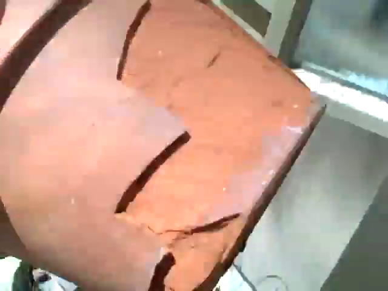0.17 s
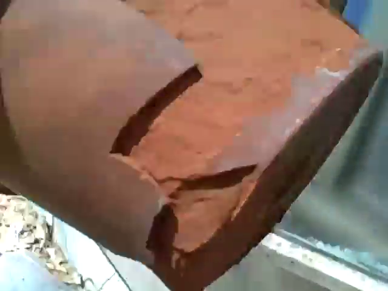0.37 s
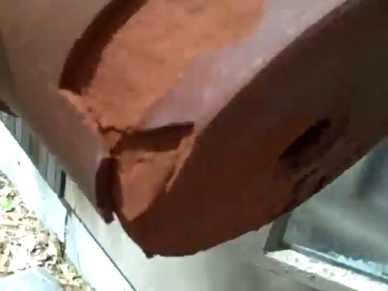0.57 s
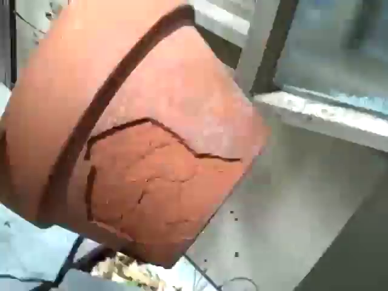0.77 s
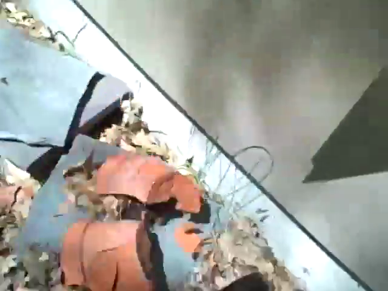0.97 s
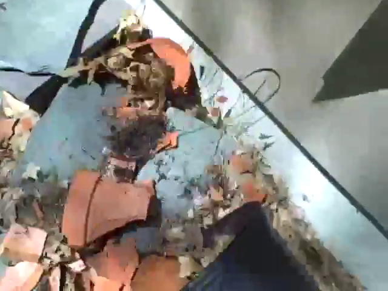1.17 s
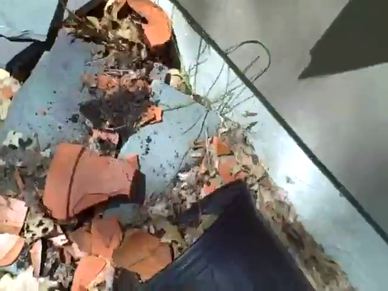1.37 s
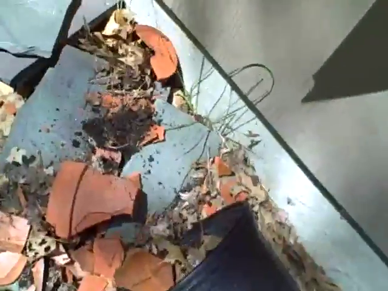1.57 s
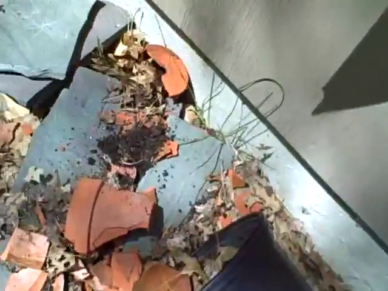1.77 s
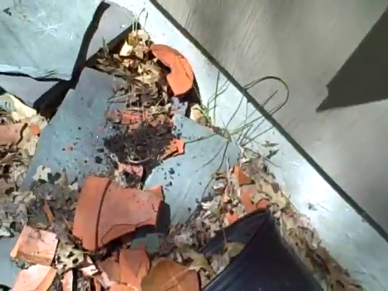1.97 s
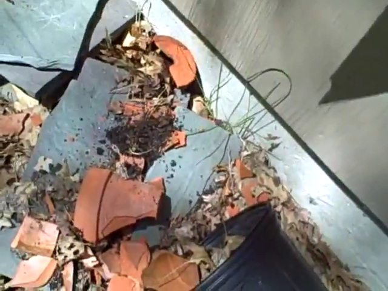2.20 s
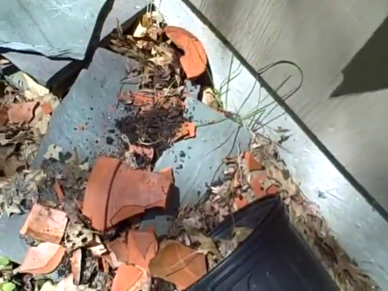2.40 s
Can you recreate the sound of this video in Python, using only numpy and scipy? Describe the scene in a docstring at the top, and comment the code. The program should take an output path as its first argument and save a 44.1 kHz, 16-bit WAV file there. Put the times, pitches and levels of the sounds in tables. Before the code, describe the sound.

A terracotta pot shatters on stone slabs after a quiet second of faint ticks; shards clatter and crumbs patter out quickly. Outdoors, close microphone overloading slightly, with distant traffic, light wind rumble and a faint bird.

```python
"""A terracotta pot is swung and thrown on stone slabs outdoors. It bursts in a dense run of cracks made of many
tiny rings; large shards chatter, crack and ring briefly, heavy pieces thud, soil and crumbs patter into dry leaves.
Filtered noise makes the distant traffic and the wind on the microphone; blurred gliding whistles make a far bird.
The recorder turns its gain down for a while after the crash and overloads on the peaks."""
import sys
import numpy as np
from scipy import signal
from scipy.io import wavfile
from scipy.ndimage import uniform_filter1d

SR = 44100
rng = np.random.default_rng(int(sys.argv[2]) if len(sys.argv) > 2 else 0)


def ratio(d):
    """dB to gain"""
    e = np.asarray(d, float) / 20
    return 10 ** e


def to_wav(sig):
    """Store sig (one row per channel, or 1-D mono) as 16-bit WAV at the path in sys.argv[1].

    Samples outside -1..1 are clipped; the rate is SR.
    """
    pcm = np.clip(np.atleast_2d(sig), -1, 1) * 32767
    pcm = np.round(pcm).astype(np.int16)
    wavfile.write(sys.argv[1], SR, pcm.T)  # frames by channels


N = 107559
T = np.arange(N) / SR  # time of each sample, s


def rms_one(x):
    """Scale to an rms (average strength) of 1."""
    return x / np.sqrt(np.mean(x ** 2) + 1e-20)


def at_hz(points, hz):
    """Read a spectrum of (Hz, dB) points at one pitch, with straight lines on a log pitch axis."""
    point_hz, point_db = np.transpose(points)
    return np.interp(np.log(hz), np.log(point_hz), point_db)


def level_over_time(points):
    """Join (s, dB) points with straight lines: one dB value for each sample."""
    return np.interp(T, *np.transpose(points))


def band(x, low_hz, high_hz):
    """Keep what lies between two pitches (Butterworth band-pass)."""
    edges_hz = [low_hz, min(high_hz, .45 * SR)]
    return signal.sosfilt(signal.butter(2, edges_hz, "band", fs=SR, output="sos"), x)


def drift(rate_hz):
    """Slow random wandering with rms 1, worked out at every 40th sample and joined by lines."""
    step = 40
    r = np.exp(-2 * np.pi * step * rate_hz / SR)
    chance = rng.standard_normal(N // step + 2002)
    slow = signal.lfilter([1], [1, -2 * r, r * r], chance)[2000:]  # skip the filter's start
    return np.interp(np.arange(N) / step, np.arange(len(slow)), rms_one(slow))


def ring(clicks, hz, t60_s):
    """A resonator: each unit click starts a sine of height 1 that dies by 60 dB in t60_s."""
    r = ratio(-60 / (t60_s * SR))
    w = 2 * np.pi * min(hz, .45 * SR) / SR
    return signal.lfilter([0, np.sin(w)], [1, -2 * r * np.cos(w), r * r], clicks + 1e-18)


def add(out, start_s, piece, peak_db):
    """Lay a short sound into out at its start time, scaled to the given peak."""
    i = int(start_s * SR)
    out[i:i + len(piece)] += (ratio(peak_db) * piece / np.abs(piece).max())[:N - i]


def traffic():
    """Distant traffic: third-octave bands of noise, each flickering a little."""
    # spectrum of the far roar: pitch_hz [Hz], level_db [dB per Hz, relative]
    roar_colour = [(60, -1), (171, -8), (260, -7.5), (700, -11), (1420, -15.5), (2600, -25), (5220, -35),
                   (9000, -61)]
    # strength of the roar over time: time_s [s], level_db [dB]
    roar_level = [(0, -51.5), (2.0, -52), (2.35, -49.5)]
    edges_hz = 60 * 2 ** np.arange(0, 7.4, 1 / 3)
    white = rng.standard_normal((2, N))  # neighbouring bands take turns with two noises
    roar = np.zeros(N)
    for k, (low_hz, high_hz) in enumerate(zip(edges_hz, edges_hz[1:])):
        level_db = at_hz(roar_colour, np.sqrt(low_hz * high_hz)) + 0.4 * drift(12)
        roar += ratio(level_db) * band(white[k % 2], low_hz, high_hz)
    return ratio(level_over_time(roar_level)) * rms_one(roar)


def wind():
    """Wind on the microphone: lumpy low noise that follows the gusts, plus short swings of pressure."""
    # strength of the wind over time: time_s [s], level_db [dB]
    gusts = [(0.0, -54.5), (0.57, -57.5), (0.8, -51), (1.0, -50.5), (1.4, -53), (1.97, -46.5), (2.16, -53),
             (2.44, -56.5)]
    # single buffets: start_s [s], peak_db [dB], pitch_hz [Hz]
    buffets = [(0.771, -41.5, 39.3), (0.795, -37, 59.5), (0.877, -40, 50), (1.558, -30.5, 51),
               (1.607, -35.5, 55), (1.673, -36, 59.9), (1.869, -33, 31.6), (1.93, -42.5, 44.5),
               (2.102, -42, 39.67), (2.14, -41, 45), (2.408, -33, 44.6)]
    wind_hz, lumps_db = 85, 2
    noise = rng.standard_normal(N + SR)
    low = band(band(noise, 24, wind_hz), 10, 3.7 * wind_hz)[SR:]  # skip the filters' start
    out = ratio(level_over_time(gusts)) * rms_one(low * ratio(lumps_db * drift(9)))
    for start_s, peak_db, pitch_hz in buffets:
        turns = T[:int(1.6 * SR / pitch_hz)] * pitch_hz  # 1.6 cycles
        swell = np.sin(np.pi * (turns / turns[-1]) ** .5) ** 2  # rises faster than it falls
        add(out, start_s, -np.sin(2 * np.pi * turns) * swell, peak_db)
    return out


def bird():
    """A buzzy far bird: gliding sine whistles multiplied by slow noise, which blurs their pitch."""
    # whistles: start_s [s], end_s [s], start_hz [Hz], end_hz [Hz], level_db [dB, sine height before the blur]
    whistles = [(0, 0.192, 5320, 5130, -69), (0, 0.172, 4640, 4530, -70), (1.908, 2.046, 3363, 3306, -69),
                (2.324, 2.458, 3996, 4960, -63)]
    blur_hz, fade_s = 230, 0.021
    out = np.zeros(N)
    blur_filter = signal.butter(2, blur_hz, fs=SR, output="sos")
    blur = rms_one(signal.sosfilt(blur_filter, rng.standard_normal(N)))
    for start_s, end_s, start_hz, end_hz, level_db in whistles:
        time_inside = np.minimum(T - start_s + fade_s, end_s - T + 0.0059)
        shape = np.clip(time_inside / fade_s, 0, 1)
        pitch_hz = np.interp(T, [start_s, end_s], [start_hz, end_hz])
        out += ratio(level_db) * shape * np.sin(2 * np.pi * np.cumsum(pitch_hz) / SR)
    return out * blur


def ticks():
    """Crumbs ticking in the pot and on the ground: each gives a bright scratch and one small ring."""
    # crumbs: start_s [s], peak_db [dB], pitch_hz [Hz], ring_db [dB, ring height over the scratch's first rms]
    crumbs = [(0.4495, -40.5, 2350, 0), (0.449, -43.5, 4290, 0), (0.540, -44, 3000, -16),
              (0.5708, -41.5, 2320, 0), (0.649, -38, 2320, 2.5), (0.8093, -48, 3830, 1),
              (0.857, -37.5, 2550, -4), (1.679, -38.5, 1105, -8), (1.686, -40, 6610, -3.5),
              (1.716, -39.5, 4260, -1.5), (1.7986, -46, 4200, -5.5), (1.8273, -47, 5440, -2),
              (1.841, -53, 4500, -1), (1.8617, -42.5, 4330, -10), (1.899, -53.5, 6000, -5.5),
              (1.93, -54, 7000, -3.5), (1.955, -54.5, 7400, 4.5), (2.297, -52, 5180, 3.5)]
    t60_at_2300_hz_s, scratch_decay_s = .035, 0.00275  # higher crumbs ring shorter
    out, t = np.zeros(N), T[:SR // 20]
    for start_s, peak_db, pitch_hz, ring_db in crumbs:
        noise = band(rng.standard_normal(len(t)), .7 * pitch_hz, max(6000, 1.7 * pitch_hz))
        scratch = rms_one(noise) * np.exp(-t / scratch_decay_s)
        small_ring = ring(t == 0, pitch_hz, t60_at_2300_hz_s * 2300 / pitch_hz)
        add(out, start_s, ratio(ring_db) * small_ring + scratch, peak_db)
    return out


def debris():
    """Cracking, then patter of soil and crumbs: thousands of random clicks a second, dealt to 40 small rings."""
    # strength of cracking and patter over time: time_s [s], level_db [dB]
    patter_level = [(.72, -68.5), (.80, -58.5), (.845, -50), (.865, -42), (.885, -57), (.95, -61.5),
                    (1.032, -53), (1.0328, -10.5), (1.048, -5), (1.058, -13), (1.07, -3), (1.086, -12),
                    (1.093, -16), (1.105, -25.5), (1.125, -23.5), (1.175, -30.5), (1.21, -34.5),
                    (1.24, -39.5), (1.28, -32.5), (1.33, -39), (1.42, -47), (1.55, -44.5), (1.62, -56.5),
                    (1.7, -61.5), (1.95, -68), (2.2, -68)]
    # spectrum at the loudest moment: pitch_hz [Hz], level_db [dB per Hz, relative]
    patter_colour = [(400, -23.5), (900, -2), (1500, -10), (2600, -4), (4200, -7.5), (6000, -7.5),
                     (8000, -7.5), (9500, -17)]
    grains_per_s, spread_db = 14000, 2.8
    cycles = 12.0  # a grain dies by 60 dB in this many cycles
    thinning = 0.068  # dB lost per octave under 2.5 kHz for each dB below the loudest moment
    sizes = ratio(spread_db * np.minimum(rng.exponential(1, N), 5)) * rng.choice([-1, 1], N)
    level_db = level_over_time(patter_level)
    level = ratio(level_db)
    quieter_db = level_db - level_db.max()
    grains = (rng.random(N) < grains_per_s / SR) * sizes * level
    dealt_to = rng.integers(0, 40, N)
    pitches_hz = np.geomspace(450, 9200, 40) * rng.uniform(.97, 1.03, 40)
    rings = np.zeros(N)
    for k, hz in enumerate(pitches_hz):
        octaves_under = max(0, np.log2(2500 / hz))
        clicks = grains * (dealt_to == k) * ratio(thinning * octaves_under * quieter_db)
        # hz / 3000 makes up for the shorter ring of high grains
        rings += ratio(at_hz(patter_colour, hz)) * hz / 3000 * ring(clicks, hz, cycles / hz)
    return rings * np.sqrt(np.mean(level ** 2)) / np.sqrt(np.mean(rings ** 2))


def shards():
    """Shards striking stone or each other: a short, dying chatter of contacts cracks and sets modes ringing."""
    # strikes: start_s [s], peak_db [dB], lowest_hz [Hz, lowest mode], chatter_s [s],
    # tilt_db [dB per octave, brightness of the modes], ring_db [dB, ring peak over crack peak]
    strikes = [(1.0326, 4.5, 1497, 0.0037, -0.5, -5), (1.037, 5.5, 2294, 0.006, -3.5, 8),
               (1.0505, -2.5, 3810, .005, -14, 6.5), (1.053, -5.5, 838, .006, -4.5, -1.5),
               (1.0643, 1, 2536, 0.005, -14.5, -1), (1.067, 2, 970, 0.004, -5, 14),
               (1.075, -1.5, 1476, 0.0054, -8, 6), (1.0985, -7.5, 3180, .003, -6.5, 6),
               (1.104, -7.5, 1054, 0.0068, 2.5, 4), (1.1400, -10.5, 4300, 0.0025, -6.5, -6),
               (1.143, -6.5, 880, .005, -0.5, -6), (1.1866, -10.5, 1277, 0.003, 3, 3),
               (1.1889, -9.5, 4050, 0.00088, -21, 4), (1.198, -9.5, 3120, 0.019, -6, -4.5),
               (1.219, -6.5, 869, 0.0027, -3, 12), (1.2239, -9, 850, 0.0091, 2, -4.5),
               (1.338, -17.5, 775, 0.0011, -2, 4), (1.3402, -14.5, 895, 0.002, -1.5, 2.5),
               (1.348, -27, 7380, 0.0026, -6, 13), (1.3732, -26, 2114, 0.0021, 1, 6),
               (1.3745, -24.5, 5250, .002, -4, 7), (1.437, -23, 4200, .002, -2, -20),
               (1.442, -26, 2860, .006, 2, -7), (1.5488, -20, 809, 0.0057, -5, -0.5),
               (1.6348, -38, 2460, 0.0052, -21.5, 1.5)]
    # how a shard rings: multiple [of the lowest mode], level_db [dB, before tilt], t60_s [s, if lowest is 850 Hz]
    shard_modes = [(1.0, 0, .032), (1.3, -7, .02), (2.02, -4, .028), (2.5, -12, .022), (2.92, -5, .03),
                   (3.83, -10, .025), (4.09, -9, .025), (4.5, -9, .025), (4.85, -8, .025), (5.5, -10, .022),
                   (6.09, -8, .022), (6.78, -11, .02), (7.6, -13, .02)]
    contacts_per_s, chatter_fade = 1000, 0.58  # the fade is the share of strength lost by the end
    shape_spread = 0.058  # each shard's higher modes are off by about this share
    small_dies = .25  # ring time falls with the shard's pitch to this power
    crack_decay_s = 0.0014
    out, t = np.zeros(N), T[:SR // 10]
    for start_s, peak_db, lowest_hz, chatter_s, tilt_db, ring_db in strikes:
        happens = (rng.random(len(t)) < contacts_per_s / SR) * (t < chatter_s)
        contacts = happens * rng.uniform(0.1, 1, len(t)) * (1 - chatter_fade * t / chatter_s)
        contacts[0] = 1
        oddness = np.r_[1, rng.normal(1, shape_spread, len(shard_modes) - 1)]
        modes = np.zeros(len(t))
        for (multiple, level_db, t60_s), odd in zip(shard_modes, oddness):
            push = contacts * rng.uniform(0.5, 1, len(t)) * rng.choice([-1, 1])
            mode = ring(push, lowest_hz * multiple * odd, t60_s * (850 / lowest_hz) ** small_dies)
            modes += ratio(level_db + tilt_db * np.log2(multiple)) * mode
        modes = band(modes, .7 * lowest_hz, 15000)
        low_hz = min(0.77 * lowest_hz, 3000)
        noise = band(band(rng.standard_normal(len(t)), low_hz, 7000), low_hz, 5300)
        # every contact starts a dying burst of noise
        crack = noise * signal.lfilter([1], [1, -np.exp(-1 / (crack_decay_s * SR))], contacts)
        strike = ratio(ring_db) * modes / np.abs(modes).max() + crack / np.abs(crack).max()
        add(out, start_s, strike, peak_db)
    return out


def thuds():
    """Dull thuds of heavy pieces and clods: a soft push, ringing low, and a dying puff of low noise."""
    # thuds: start_s [s], peak_db [dB], pitch_hz [Hz], puff_t60_s [s]
    heavy_pieces = [(1.032, -29, 89, 0.34), (1.034, -13, 307, 0.088), (1.055, -11.5, 510, 0.17),
                    (1.069, -26, 200, 0.37), (1.1, -22, 301, 0.13), (1.232, -34.5, 113, 0.26),
                    (1.296, -25, 383, 0.041), (1.298, -37, 149, 0.3)]
    out, t = np.zeros(N), T[:SR // 3]
    for start_s, peak_db, pitch_hz, puff_t60_s in heavy_pieces:
        noise = band(rng.standard_normal(len(t)), .5 * pitch_hz, 1.6 * pitch_hz)
        puff = rms_one(noise) * ratio(-60 * t / puff_t60_s)
        push = ring(t == 0, pitch_hz, .3 * puff_t60_s)
        add(out, start_s, puff + push, peak_db)
    return out


def echoes(pot):
    """Echoes off wall and ground: later, weaker copies of the pot with the treble softened."""
    # echoes: delay_s [s], level_db [dB, against the softened pot]
    bounces = [(.0047, -19), (0.0121, -20), (0.017, -27), (.031, -18.5)]
    dull = signal.lfilter([.6], [1, -.4], pot)
    return sum(ratio(level_db) * np.interp(T - delay_s, T, dull, left=0) for delay_s, level_db in bounces)


def scene():
    """The breaking pot and its echoes, over traffic, wind and bird."""
    background = traffic() + wind() + bird()
    pot = ticks() + debris() + shards() + thuds()
    return (pot + echoes(pot) + background)[None]


def gain_control(dry):
    """Automatic gain: loud sound turns the gain down by up to 5 dB; it then recovers slowly."""
    threshold_db, most_drop_db, release_db_per_s, smoothing_s = -36, 5, 23, 0.046
    level_db = 10 * np.log10(uniform_filter1d(dry[0] ** 2, size=441) + 1e-12)  # over 10 ms
    fall_db = release_db_per_s * T
    held_db = np.maximum.accumulate(level_db + fall_db) - fall_db  # falls no faster than the release
    wanted_db = np.clip(0.32 * (held_db - threshold_db), 0, most_drop_db)
    r = np.exp(-1 / (smoothing_s * SR))
    drop_db = signal.lfilter([1 - r], [1, -r], wanted_db)
    return dry * ratio(-drop_db)


def overload(x):
    """Peaks bend over smoothly and cannot pass the ceiling."""
    ceiling = .72
    x = x / ceiling
    return ceiling * x / (1 + x ** 6) ** (1 / 6)


def cut_top(x):
    """Two low-pass filters, run forwards and backwards: a roll-off and then a steep cut."""
    x = signal.sosfiltfilt(signal.butter(4, 7850, fs=SR, output="sos"), x)
    return signal.sosfiltfilt(signal.cheby2(10, 40, 9500, fs=SR, output="sos"), x)


def low_pass(x):
    """Removes everything above the highest recorded frequency."""
    return signal.sosfilt(signal.butter(12, 9430, fs=SR, output="sos"), x)


def record(dry):
    """The recorder: its gain ducks after loud sound, peaks overload and the top is cut."""
    mix = cut_top(overload(gain_control(dry)))
    return low_pass(mix)


dry = scene()
out = record(dry)
to_wav(out)
```